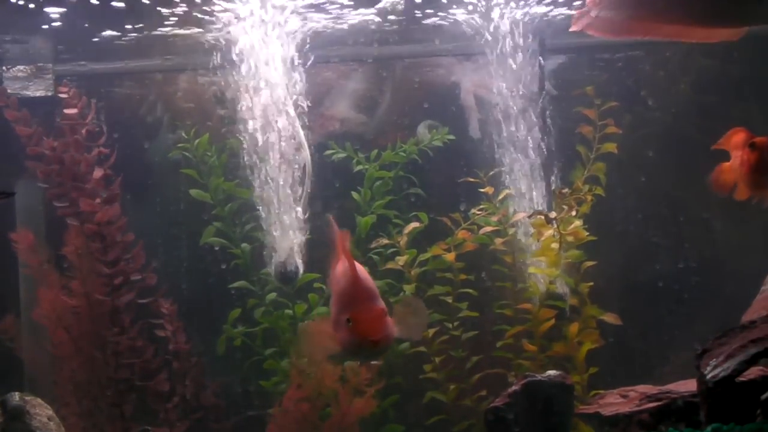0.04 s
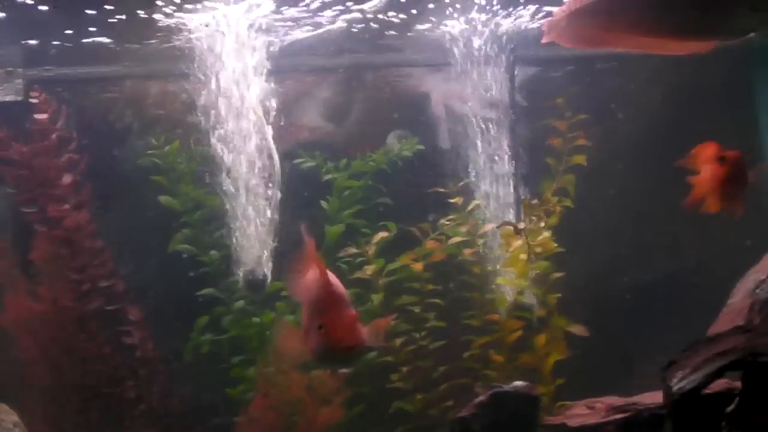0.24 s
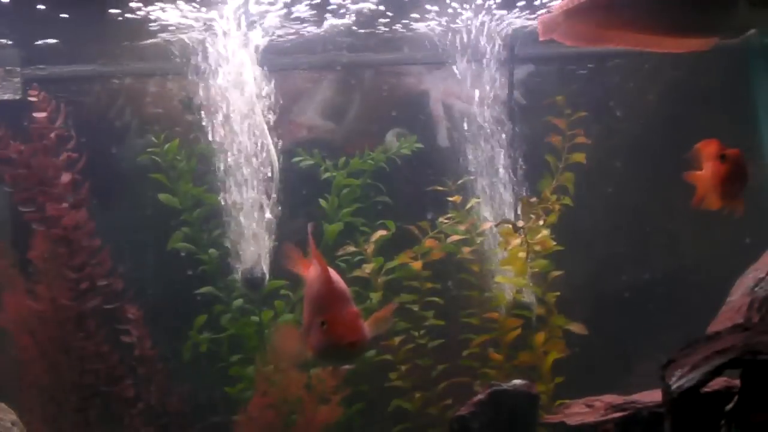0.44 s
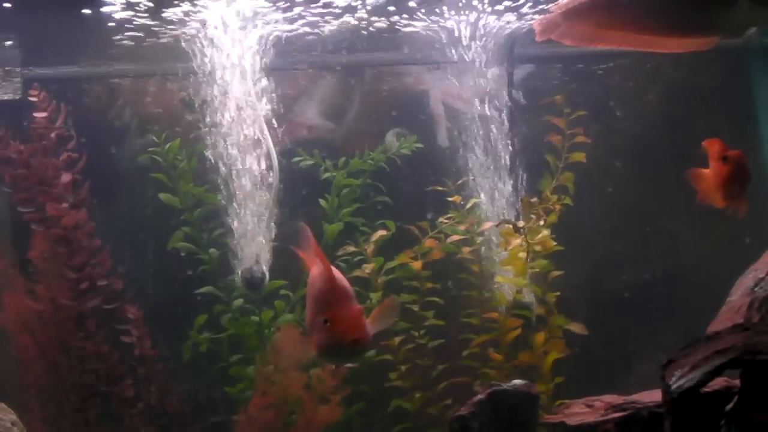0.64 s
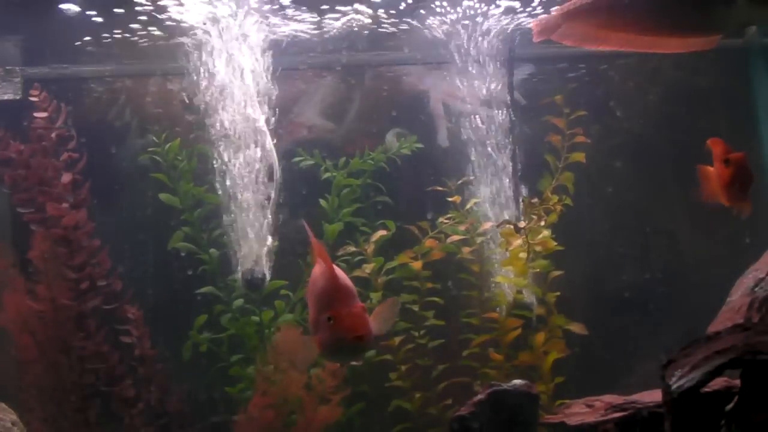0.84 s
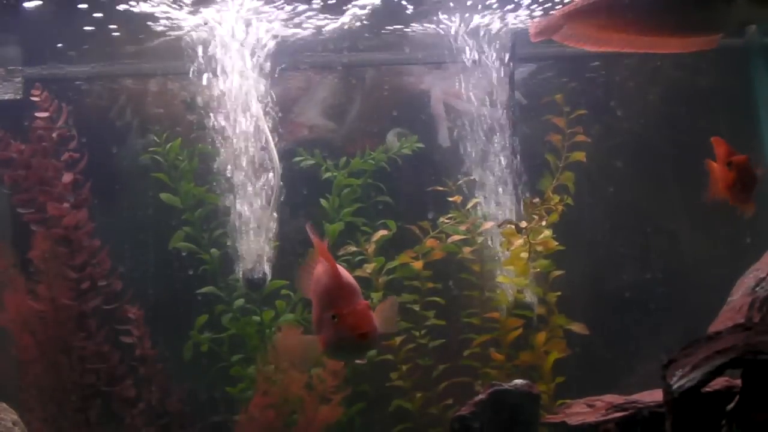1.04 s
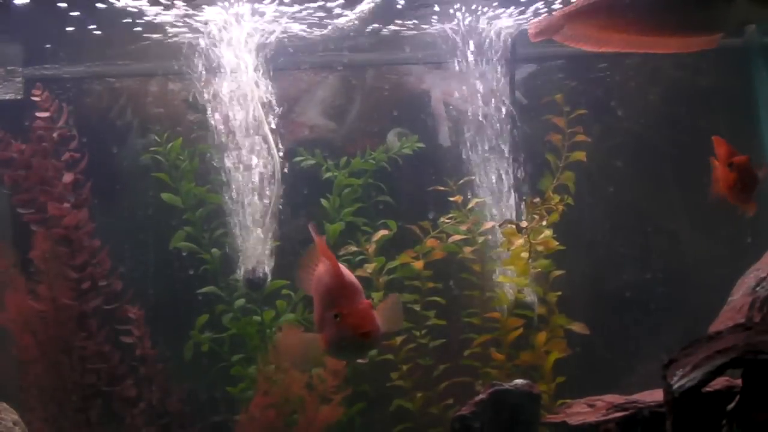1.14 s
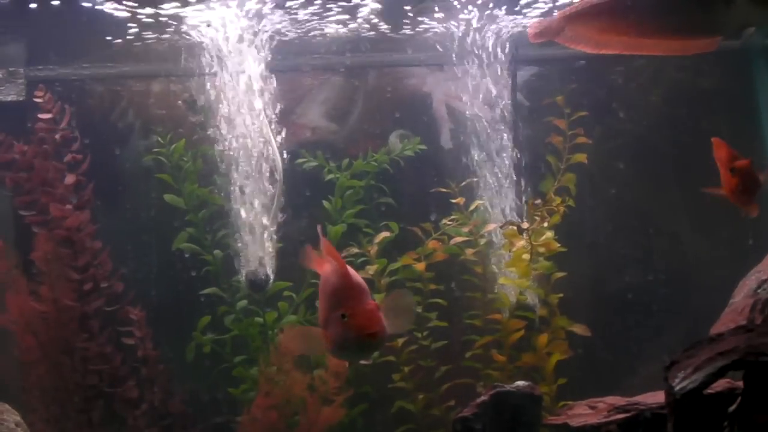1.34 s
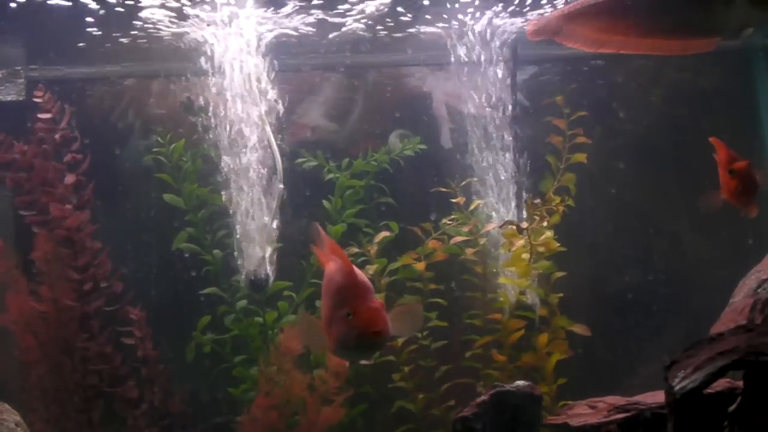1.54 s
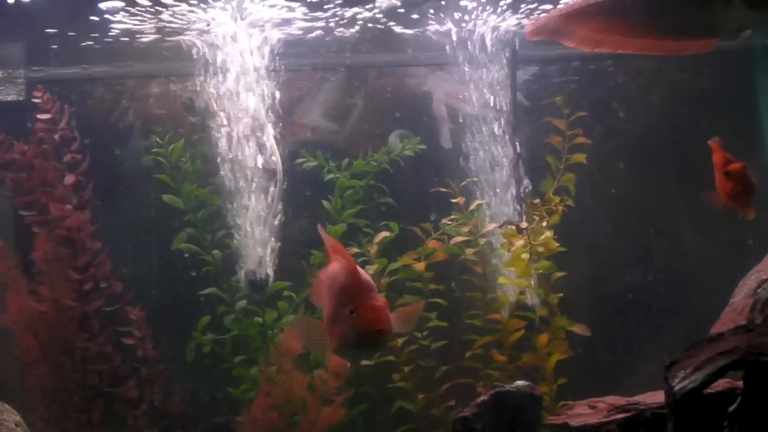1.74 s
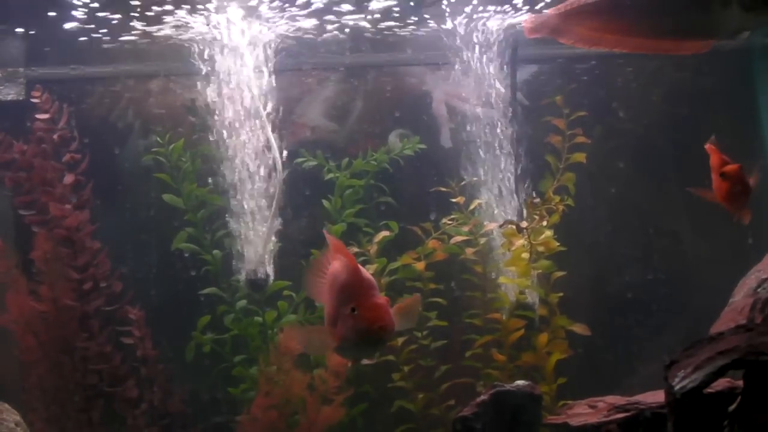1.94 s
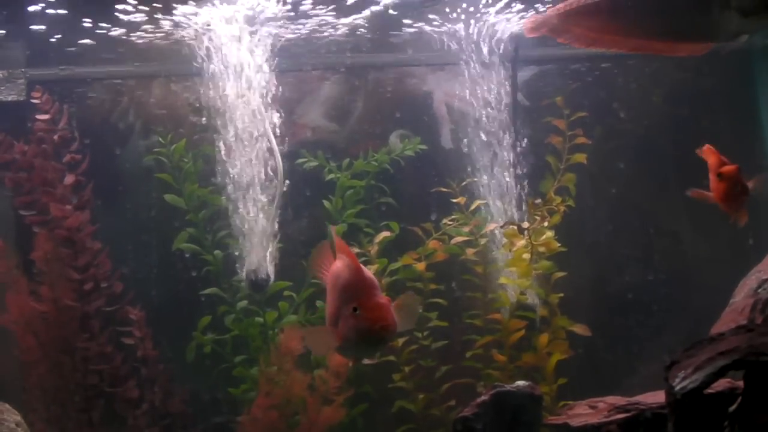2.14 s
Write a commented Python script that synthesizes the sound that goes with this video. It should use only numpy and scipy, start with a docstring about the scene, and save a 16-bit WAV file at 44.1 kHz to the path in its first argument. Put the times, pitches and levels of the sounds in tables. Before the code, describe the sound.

Steady fish tank bubbling in a quiet room, with soft rushing water and low pump hum. A short, dry knock hits near the microphone at the start, followed by scattered bubble plops, livelier splashing and foam spits.

```python
"""Bubbles gurgle and fizz without a break: two air stones in an aquarium, in a quiet room.
Each bubble is a click that sets a short ring going. Under them lie a noise wash of water and filter,
the pump's mains harmonics with a chattering housing, and a thin electrical whine.
Early on, one short, hollow knock close to the microphone rings a set of decaying modes.
Larger bubbles then plop as gliding sines, and bursting foam spits brief noise."""
import sys
import numpy as np
from scipy import signal
from scipy.fft import rfft, irfft
from scipy.io import wavfile

SR = 44100
rng = np.random.default_rng(int(sys.argv[2]) if len(sys.argv) > 2 else 0)


def master(y):
    """Save y as 16-bit WAV."""
    cut = np.clip(np.atleast_2d(y).T, -1, 1)
    pcm = np.round(cut * 32767)  # scale
    wavfile.write(sys.argv[1], SR, pcm.astype(np.int16))


N = 97020
T = np.arange(N) / SR  # time [s]


def from_db(db):
    """Turn decibels into an amplitude factor."""
    return 10 ** (np.asarray(db) / 20)


def rms_one(x):
    """Scale to unit power."""
    return x / np.sqrt(np.mean(x ** 2) + 1e-20)


def per_bin(points):
    """Read a (frequency, value) table at every spectral bin, along a logarithmic frequency axis."""
    hz, value = np.transpose(points)
    bins_hz = np.fft.rfftfreq(N, 1 / SR)
    return np.interp(np.log(bins_hz + 1e-9), np.log(hz), value)


def drift(rate_hz):
    """Slow random wander of rms 1: noise through two equal low-pass poles, made at every 40th sample."""
    step = 40
    pole = np.exp(-2 * np.pi * rate_hz * step / SR)
    settling = 2000
    chance = rng.standard_normal(N // step + settling + 2)
    slow = signal.lfilter([1], [1, -2 * pole, pole ** 2], chance)[settling:]
    return np.interp(np.arange(N) / step, np.arange(len(slow)), rms_one(slow))


def ring(clicks, hz, t60_s):
    """A two-pole resonator: each unit click starts a decaying sine of height 1."""
    radius = np.exp(-np.log(1000) / (t60_s * SR))
    angle = 2 * np.pi * hz / SR
    feedback = [1, -2 * radius * np.cos(angle), radius ** 2]
    return signal.lfilter([0, np.sin(angle)], feedback, clicks + 1e-18)


def burst(start_s, attack_s, t60_s):
    """Envelope that rises with time constant attack_s and decays by 60 dB in t60_s."""
    age = np.maximum(T - start_s, 0)
    return (1 - np.exp(-age / attack_s)) * np.exp(-np.log(1000) * age / t60_s)


# How alike the room sounds at left and right: (frequency [Hz], correlation)
LIKENESS = [(50, 0.94), (120, 0.72), (240, 0.34), (480, 0.58), (950, 0.64), (1900, 0.58), (3800, 0.29),
            (7500, .33), (15000, .02)]


def in_room(pair):
    """Mix two unrelated signals to left and right, alike in the bass, diffuse in the treble; rms 1."""
    alike = np.clip(per_bin(LIKENESS), -1, 1)
    mid, side = rfft(pair)
    shared = np.sqrt(1 + alike) * mid
    opposed = np.sqrt(1 - alike) * side * [[1], [-1]]
    return rms_one(irfft(shared + opposed, N))


def noise(spectrum):
    """Stereo noise of rms 1, coloured by a (frequency, level) table."""
    white = rng.standard_normal((2, N))
    coloured = irfft(rfft(white) * from_db(per_bin(spectrum)), N)
    return in_room(coloured)


STRENGTH_SPREAD_DB = 3  # mean of the exponential spread in bubble strength


def swarm(low_hz, high_hz, per_s, cycles, db, count=14):
    """Bubbles burst at random, with random strength, each ringing briefly at one of count pitches."""
    spread = np.minimum(rng.exponential(1, (2, N)), 4)
    strengths = from_db(STRENGTH_SPREAD_DB * spread) * rng.choice([-1, 1], (2, N))
    clicks = strengths * (rng.random((2, N)) < per_s / SR)
    pitch_number = rng.integers(0, count, (2, N))
    rings = np.zeros((2, N))
    for k, hz in enumerate(np.geomspace(low_hz, high_hz, count)):
        rings += ring(clicks * (pitch_number == k), hz, cycles / hz)
    band_hz = [0.82 * low_hz, 1.13 * high_hz]
    band = signal.butter(2, band_hz, "band", fs=SR, output="sos")
    return from_db(db) * in_room(signal.sosfilt(band, rings))


# Bubble swarms at the tank, from deep to high:
# (lowest pitch [Hz], highest pitch [Hz], rate [bubbles/s], 60 dB decay [cycles], level [dB])
GURGLE = (363.5, 470, 138.5, 45, -60.5)
BURBLE = (515, 1097, 346.5, 30, -59.5)
SPLASH = (1215, 1465, 1480, 31, -55)
SPRAY = (1526, 2689, 904, 40, -60)
FIZZ = (2616, 7404, 4007, 24.5, -59.5)
# Strength of the surface splashing: (time [s], level [dB])
SPLASHING = [(.0, -8.5), (.95, -9), (1.05, -9.5), (1.134, 3), (1.226, -0.5), (1.26, -6.5), (1.664, -6.5),
             (1.804, -9.5), (1.942, -1.5), (2.13, -0.5), (2.2, -8)]


def bubbling():
    """Ringing bubble swarms: gurgle, burble and fizz hold steady, splash and spray follow the surface."""
    splashing = from_db(np.interp(T, *np.transpose(SPLASHING)))
    steady = swarm(*GURGLE) + swarm(*BURBLE) + swarm(*FIZZ)
    # The spray follows the splashing by half as many decibels.
    return steady + splashing * swarm(*SPLASH) + np.sqrt(splashing) * swarm(*SPRAY)


# Colour of the water and the low filter rumble: (frequency [Hz], relative level per Hz [dB])
WASH = [(20, -13), (45, -10.5), (65, -5), (115, 0.5), (175, 0), (235, -7.5), (310, -9), (390, 7),
        (580, 1.5), (760, -3.5), (880, 2), (1500, -8), (2200, -6), (2420, -2), (2700, -12), (3100, -12),
        (4800, -9), (7200, -4), (8600, -10.5), (9400, -13), (10700, -21.5), (11800, -20), (13200, -12.5),
        (15700, -13)]
WASH_DB, WASH_WAVER_DB = -50.5, 0.5


def wash():
    """Coloured noise of water and filter, its level wavering slightly."""
    return from_db(WASH_DB + WASH_WAVER_DB * drift(2.8)) * noise(WASH)


def tone(hz):
    """A steady stereo sine of rms 1, its phase differing between the sides."""
    phase = 2 * np.pi * rng.random() + rng.normal(0, 0.51, (2, 1))
    return np.sqrt(2) * np.sin(2 * np.pi * hz * T + phase)


MAINS_HZ = 60
WAVER_DB = 3.5  # rms wander of each buzz harmonic and of the whine
# Buzz of the air pump: (multiple of the mains frequency, level [dB])
BUZZ = [(6, -75), (9, -58.5), (10, -77.5), (22, -65.5), (32, -70.5), (39, -71.5), (44, -76.5), (49, -79),
        (55, -102)]


def buzz():
    """Mains harmonics of the air pump, each wavering on its own."""
    out = np.zeros((2, N))
    for multiple, db in BUZZ:
        out += from_db(db + WAVER_DB * drift(7.4)) * tone(MAINS_HZ * multiple)
    return out


CHATTER_DB, CHATTER_DB_PER_OCTAVE = -62, -4
CHATTER_LOW_HZ, CHATTER_HIGH_HZ = 1538, 7400


def chatter(count=125):
    """The pump's housing chatters at the mains rate: dense harmonics of random strength and phase."""
    hz = MAINS_HZ * np.arange(1, count)
    hz = hz[(hz > CHATTER_LOW_HZ) & (hz < CHATTER_HIGH_HZ)]
    bins = np.round(hz * N / SR).astype(int)
    real, imaginary = rng.standard_normal((2, 2, len(bins)))
    lines = np.zeros((2, N // 2 + 1), complex)
    lines[:, bins] = (real + 1j * imaginary) * from_db(CHATTER_DB_PER_OCTAVE * np.log2(hz))
    return from_db(CHATTER_DB) * in_room(rms_one(irfft(lines, N)))


WHINE_HZ, WHINE_DB = 15734, -75


def whine():
    """A thin electrical whine: one high, wavering sine."""
    return from_db(WHINE_DB + WAVER_DB * drift(10)) * tone(WHINE_HZ)


# Contacts of the knock, close to the microphone: (time [s], level [dB])
CONTACTS = [(.2108, -10.5), (.21244, 0)]
# Modes of the hollow body: (frequency [Hz], level [dB], 60 dB decay [s],
# left over right [dB], delay of the left side, or of the right if negative [s])
KNOCK_MODES = [(82, -27.5, 0.036, -7, .0002), (156.4, -15, 0.073, -6, 0.0023),
               (392, -2, 0.035, -3, 0.00061), (497, -4, .016, -2, 0.000013), (778, -15, 0.06, -2, 0.00032),
               (865, -4, .032, 6.5, 0.00021), (988, -4, 0.02, 7, 0.00025), (1191, -21.5, 0.032, 11, 0.0002),
               (1625, -5, 0.0097, -10, 0.000014), (1997, -8, 0.011, -8.5, 0.000039),
               (3556, -26, 0.022, 2, 0.00003)]
# Colours of the crack and of the noise tail: (frequency [Hz], relative level per Hz [dB])
CRACK = [(500, -18), (1500, 4), (2700, -1.5), (4500, -3), (6500, 3.5), (9000, -11), (12000, -19),
         (16000, -11)]
TAIL = [(25, -7), (90, -8), (240, 12), (600, -9.5), (1500, 9), (2800, 1.5), (4500, 1.5), (6800, 3),
        (9000, -8), (16000, -41)]
MODE_ATTACK_S, CRACK_ATTACK_S, TAIL_ATTACK_S = 0.0018, 0.00039, 0.003
CRACK_DB, CRACK_T60_S = -17, 0.01  # level relative to the contact
TAIL_DB, TAIL_T60_S = -29, 0.1  # level relative to the contact


def knock():
    """A light touch and the main blow ring the hollow body; each adds a crack and a soft noise tail."""
    out = np.zeros((2, N))
    crack, tail = noise(CRACK), noise(TAIL)
    for s, db in CONTACTS:
        for hz, mode_db, t60_s, pan_db, lag_s in KNOCK_MODES:
            starts = s + np.maximum([[lag_s], [-lag_s]], 0)
            gains = from_db(db + mode_db + pan_db * np.array([[0.5], [-0.5]]))
            sine = np.sin(2 * np.pi * hz * (T - starts))
            out += gains * burst(starts, MODE_ATTACK_S, t60_s) * sine
        out += from_db(db + CRACK_DB) * burst(s, CRACK_ATTACK_S, CRACK_T60_S) * crack
        out += from_db(db + TAIL_DB) * burst(s, TAIL_ATTACK_S, TAIL_T60_S) * tail
    return out


# Single larger bubbles: (time [s], starting pitch [Hz], level before the envelope [dB])
PLOPS = [(.413, 363, -40), (0.48, 391, -34.5), (.722, 1080, -41), (1.078, 510, -42), (1.197, 517, -40),
         (1.357, 1286, -37), (1.862, 1215, -39.5), (2.003, 1318, -39), (2.094, 388, -36.5)]
PLOP_T60_S, PLOP_ATTACK_S = 0.047, 0.0028
PLOP_RISE_PER_S = 1.2  # rise as a fraction of the starting pitch


def plops():
    """Larger bubbles ring as decaying sines and rise a little in pitch as they surface."""
    out = np.zeros(N)
    for s, hz, db in PLOPS:
        age = T - s
        cycles = hz * age * (1 + PLOP_RISE_PER_S * age / 2)
        out += from_db(db) * burst(s, PLOP_ATTACK_S, PLOP_T60_S) * np.sin(2 * np.pi * cycles)
    return out


# Spits of bursting foam: (time [s], level before the envelope [dB])
SPITS = [(.968, -55), (1.023, -46), (1.835, -43.5)]
# Colour of a spit: (frequency [Hz], relative level per Hz [dB])
SPIT = [(500, -17), (2000, 5), (3800, 2.5), (7000, 3), (10500, -2.5), (16000, -9)]
SPIT_ATTACK_S, SPIT_T60_S = 0.002, 0.1


def spits():
    """Bursting foam: brief, decaying puffs of coloured noise."""
    envelope = sum(from_db(db) * burst(s, SPIT_ATTACK_S, SPIT_T60_S) for s, db in SPITS)
    return envelope * noise(SPIT)


def scene():
    """The tank, its pump and the knock together."""
    return bubbling() + wash() + buzz() + chatter() + whine() + knock() + plops() + spits()


OVERLOAD = 1.4  # ceiling towards which peaks are rounded off
NOTCH_HZ, NOTCH_WIDTH_HZ = 8000, 480  # narrow gap in the microphone's response, width per pass
CUTOFF_HZ = 15760


def record(dry):
    """The microphone rounds the highest peaks and loses one narrow band; the top is cut steeply."""
    x = OVERLOAD * np.tanh(dry / OVERLOAD)
    b, a = signal.iirnotch(NOTCH_HZ, NOTCH_HZ / NOTCH_WIDTH_HZ, fs=SR)
    for _ in range(3):
        x = signal.lfilter(b, a, x)
    # 16th order, 0.2 dB ripple below the cutoff, 70 dB rejection above
    top_cut = signal.ellip(16, 0.2, 70, CUTOFF_HZ, fs=SR, output="sos")
    return signal.sosfilt(top_cut, x)


dry = scene()
out = record(dry)
master(out)
```